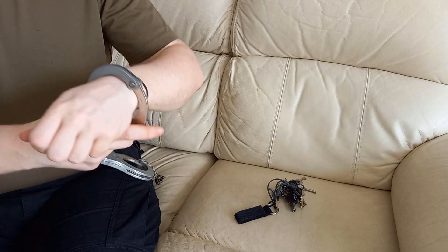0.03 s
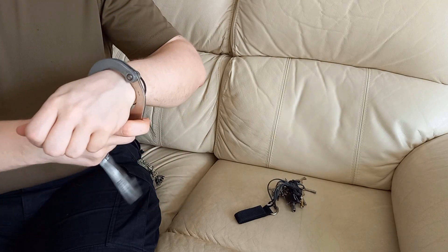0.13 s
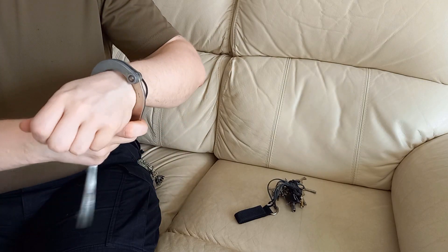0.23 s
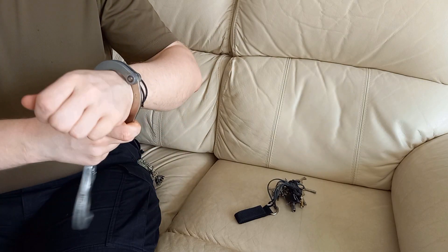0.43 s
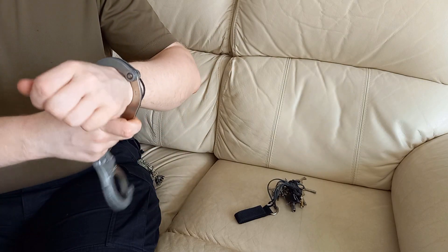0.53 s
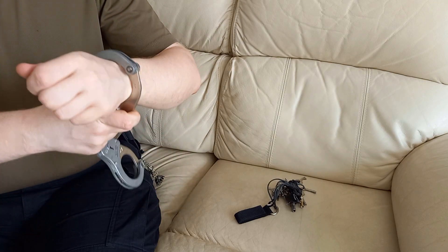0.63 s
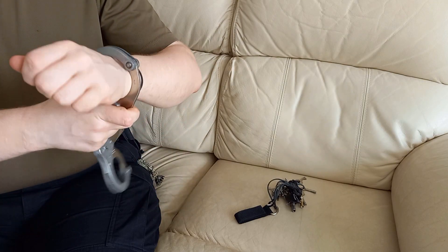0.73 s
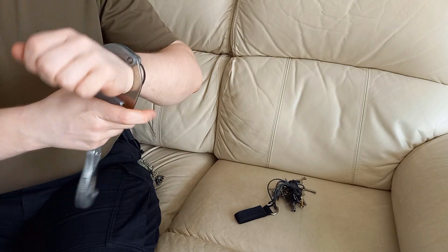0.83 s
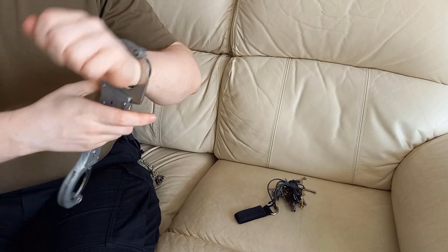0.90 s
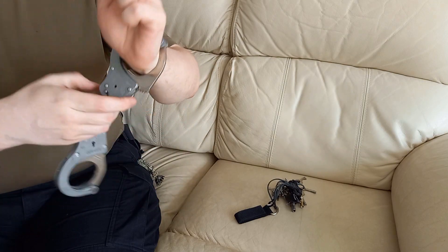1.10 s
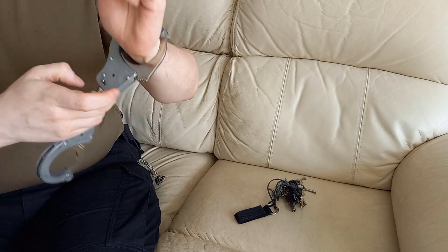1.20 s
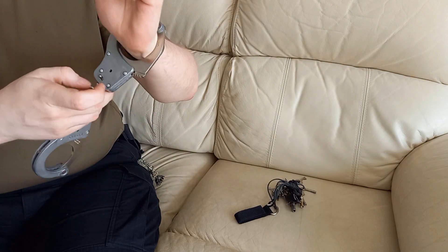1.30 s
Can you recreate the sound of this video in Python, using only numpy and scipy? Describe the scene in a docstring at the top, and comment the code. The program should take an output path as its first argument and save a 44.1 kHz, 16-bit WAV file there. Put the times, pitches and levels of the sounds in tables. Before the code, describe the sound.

Steel handcuff ratchet snaps rapidly five times, clicks once again, then its chain jingles softly

```python
"""Faint room tone with a dying clink tail and soft chain clinks; then steel handcuffs close on a wrist.
The pawl snaps over five ratchet teeth, then one more, and the chain and free cuff clink again.
A snap is chattering noise plus decaying steel modes, a dull knock and a low thump, mostly on the left.
Clinks are shorter, softer noise and modes; early reflections and a diffuse tail answer every click.
Room tone, the opening tail and a low rustle after the last snap are shaped noise."""
import sys
import numpy as np
from scipy import signal
from scipy.fft import rfft, irfft, next_fast_len
from scipy.io import wavfile
from scipy.ndimage import uniform_filter1d

SR = 44100
rng = np.random.default_rng(int(sys.argv[2]) if len(sys.argv) > 2 else 0)


def transcribe(signal):
    """Save signal, clipped to [-1, 1], as a 16-bit WAV file at the path in sys.argv[1]."""
    frames = np.atleast_2d(signal).T
    limited = np.clip(frames, -1, 1)
    pcm = np.round(limited * 32767).astype(np.int16)
    wavfile.write(sys.argv[1], SR, pcm)


N = 59535

# room tone spectrum: (frequency [Hz], relative density [dB per Hz])
FLOOR_SPECTRUM = [(20, -24), (45, -10), (70, 7), (130, 0), (250, -7), (600, -10.5), (1200, -19.5),
                  (3000, -22.5), (6000, -23), (12000, -27), (15000, -36), (16500, -25)]
# low rustling noise: a short dull swell just after the last snap, then cloth moving:
# (time [s], rms level [dB])
RUSTLE_LEVEL = [(.7, -101), (.78, -63), (.87, -91.5), (.95, -80), (1.05, -69), (1.13, -74), (1.22, -73.5),
                (1.35, -83.5)]
# rustle spectrum: (frequency [Hz], relative density [dB per Hz])
RUSTLE_SPECTRUM = [(25, -19), (70, 1), (200, -0.5), (600, -17), (1500, -13), (4000, -15.5), (10000, -28),
                   (16000, -44.5)]
# decay of the diffuse tail: (frequency [Hz], t60 [s])
ROOM_T60 = [(70, .6), (250, 0.53), (1000, 0.3), (2000, 0.27), (3000, 0.25), (4700, 0.27), (8000, 0.25),
            (12000, 0.22), (16000, 0.2)]
# colour of the diffuse tail: (frequency [Hz], relative gain [dB])
ROOM_GAIN = [(70, 0), (400, -2.5), (1000, -4.5), (2000, 4.5), (3000, 2.5), (4700, 1.5), (8000, -4),
             (11500, -3.5), (12800, -9.5), (14000, -1.5), (16000, -8.5)]
# chain clinks; room is before CHAIN_ROOM_DB:
# (time [s], tick [dB], link ring [dB], cuff ring [dB], swivel ring [dB], room [dB])
CLINKS = [(0.0171, -42, -60.5, -44, -59.5, 1), (.0418, -51.5, -60.5, -54.5, -70, -20.5),
          (0.1639, -65.5, -82, -71.5, -81.5, 2.5), (0.909, -44, -44.5, -61, -57, 1.5),
          (.992, -54.5, -81, -67, -77, 2.5), (1.027, -67, -91, -62.5, -91, 20.5),
          (1.0315, -52.5, -72, -74, -98, -9), (1.0577, -49.5, -39.5, -36, -48, -5.5),
          (1.122, -47.5, -39, -49.5, -44, -1.5), (1.1375, -55, -49.5, -58, -55.5, -20),
          (1.2022, -41.5, -39.5, -36, -36, -0.5), (1.224, -46.5, -39.5, -66, -51, -0.5),
          (1.2466, -44.5, -37.5, -47.5, -39, -2)]
# ratchet teeth: (time [s], crack [dB], chatter length [s], treble tilt [dB per octave, well above 1 kHz],
# pawl ring [dB], bow ring [dB], frame ring [dB], rack ring [dB], thump [dB], thump rise [s], room [dB])
TEETH = [(0.2008, -23, 0.0057, 0, -15, -16, -38, -37, -11, 0.0011, -1.5),
         (0.2324, -19.5, 0.0091, 2, -3, -12, -41.5, -25.5, -12.5, 0.00043, -1),
         (0.2767, -18.5, 0.0056, 1, -14, -4, -39, -22.5, -12.5, 0.0017, -3.5),
         (0.3323, -14.5, .003, 3.5, -17, -32, -46.5, -26.5, -21, 0.0014, -2),
         (0.4078, -16, 0.0025, 2, -14.5, -32.5, -49.5, -28.5, -27, 0.00093, -2),
         (0.7281, -26.5, 0.0069, 1, -26.5, -66, -52, -75, -21.5, 0.00044, 3)]
# modes of the chain link: (frequency [Hz], relative level [dB], t60 [s])
LINK_MODES = [(8980, -1, .016), (10550, 0, .016), (10720, -4, .014), (12300, -7, .012)]
# modes of the free cuff: (frequency [Hz], relative level [dB], t60 [s])
CUFF_MODES = [(4717, -8.5, 0.022), (6680, -17.5, .015), (11400, -13.5, .02)]
# modes of the swivel: (frequency [Hz], relative level [dB], t60 [s])
SWIVEL_MODES = [(8180, -0.5, 0.014), (12800, -5.5, .016), (13850, 3.5, 0.0083)]
# modes of the pawl: (frequency [Hz], relative level [dB], t60 [s])
PAWL_MODES = [(11470, -6, .028), (11650, -12, .02), (12130, -17, .02), (12830, 0, .024), (12990, -12, .015),
              (13800, -18, .02), (14300, -17, .02), (15550, -16, .02)]
# modes of the bow: (frequency [Hz], relative level [dB], t60 [s])
BOW_MODES = [(8500, -4, .018), (9040, 0, .016), (9280, -5, .016)]
# modes of the frame: (frequency [Hz], relative level [dB], t60 [s])
FRAME_MODES = [(1910, 0, .06), (2040, 0, .05), (2150, -4, .04), (2300, -8, .03)]
# modes of the toothed rack: (frequency [Hz], relative level [dB], t60 [s])
RACK_MODES = [(1420, -20, .04), (3350, -15, .015), (4420, -4, .025), (4570, -24, .3), (4650, -21, .3),
              (4690, -1, .03), (5020, -3, .02)]
# contact noise of a clink, also of the opening tail: (frequency [Hz], relative level [dB])
TICK_SPECTRUM = [(300, -10), (1500, -17.5), (2600, -5), (3700, 1.5), (4700, 1.5), (5500, 5.5), (7000, 5.5),
                 (10500, 7.5), (13000, -0.5), (15600, 4.5), (16600, -40.5)]
# contact noise of a tooth: (frequency [Hz], relative level [dB])
CRACK_SPECTRUM = [(200, -10.5), (700, -22), (1100, -22.5), (1600, -20), (2050, -7.5), (2550, -10.5),
                  (3200, -2), (3900, -3.5), (4700, 0), (6000, -2), (8300, 1), (10300, -1), (11500, 6.5),
                  (13500, 4), (15600, -2.5), (16600, -27.5)]
# the wrist's dull knock under each snap: (frequency [Hz], relative level [dB])
KNOCK_SPECTRUM = [(100, -5), (200, 1.5), (450, -1), (650, 1), (1000, -25.5), (2000, -34), (5000, -66.5)]

T = np.arange(int(.7 * SR)) / SR  # time axis of one click [s]
FLOOR_DB, OPENING_DB, OPENING_T60_S = -74.5, -59.5, .28
ATTACK_S, RELEASE_T60_S, TICK_S = 0.00076, 0.03, 0.0012
CHATTER_RMS_DB, CHATTER_SAG_DB_PER_S = 2.5, 452.5  # rms before clipping at two deviations
CRACK_CORRELATION = 0.25  # left to right
RING_RISE_SHARE, RING_DRIFT_RAD = 0.63, .75  # build-up per contact length; rms phase wander
RIGHT_LAG_S, RIGHT_DB = 0.0001581, -3.5
ROOM_DELAY_S, ROOM_BUILD_S, CHAIN_ROOM_DB = 0.0025, 0.011, -2.5
WALL_S, WALL_DB, WALL_T60_S = .0105, -19.5, 0.042  # reflections from nearby furniture
THUMP_RELEASE_S, THUMP_CUT_HZ, THUMP_RIGHT_DB = .013, 52, -38  # release is a time constant
BOOM_HZ, BOOM_T60_S, BOOM_DB = 66.5, 0.68, -40.5  # lowest room resonance, before the thump level
KNOCK_DB, KNOCK_S = -33, 0.0017  # level against the thump
TOP_HZ = 16350


def amp(db):
    """Amplitude ratio from dB."""
    return 10 ** (np.asarray(db) / 20)


def fade(t, t60_s):
    """Exponential decay, 60 dB in t60_s."""
    return np.exp(-np.log(1000) * t / t60_s)


def along(points, hz):
    """Interpolate (frequency, value) points on a log frequency axis."""
    point_hz, value = np.transpose(points)
    return np.interp(np.log(hz + 1), np.log(point_hz + 1), value)


def filtered(x, response):
    """Multiply the spectrum of x by a response of frequency."""
    n = x.shape[-1]
    size = next_fast_len(2 * n)
    hz = np.fft.rfftfreq(size, 1 / SR)
    return irfft(rfft(x, size) * response(hz), size)[..., :n]


def coloured(x, points, tilt_db=0, size=2048):
    """Minimum-phase filter of unit energy with the given spectrum and treble tilt."""
    hz = np.fft.rfftfreq(size, 1 / SR)
    level_db = along(points, hz) + tilt_db * np.log2(1 + hz / 1000)
    # folding the cepstrum makes the filter causal
    cepstrum = irfft(np.log(amp(level_db)))
    cepstrum[1:size // 2] *= 2
    cepstrum[size // 2 + 1:] = 0
    impulse = irfft(np.exp(rfft(cepstrum)))
    impulse = impulse / np.linalg.norm(impulse)
    return signal.fftconvolve(x, impulse[None], axes=1)[:, :x.shape[1]]


def add(out, time_s, sound):
    """Mix a stereo sound into out at time_s."""
    part = out[:, max(round(time_s * SR), 0):][:, :sound.shape[1]]
    part += sound[:, :part.shape[1]]


def hiss(spectrum):
    """Stereo shaped noise of rms 1."""
    noise = filtered(rng.standard_normal((2, N)), lambda hz: amp(along(spectrum, hz)))
    return noise / noise.std()


def background():
    """Faint room tone, the fading tail of an earlier clink, and a low rustle: a dull swell, then cloth."""
    t = np.arange(N) / SR
    room_tone = amp(FLOOR_DB) * hiss(FLOOR_SPECTRUM)
    opening = amp(OPENING_DB) * fade(t, OPENING_T60_S) * hiss(TICK_SPECTRUM)
    rustle = amp(np.interp(t, *np.transpose(RUSTLE_LEVEL))) * hiss(RUSTLE_SPECTRUM)
    return room_tone + opening + rustle


def in_room(click, room_db, size=512):
    """The click reaches the left microphone first; early reflections and a diffuse tail follow."""
    hz, t, bins = signal.stft(rng.standard_normal((2, len(T))), SR, nperseg=size)
    t60_s = along(ROOM_T60, hz)[:, None]
    # gain offsets the energy of each band's decay length
    gain = amp(along(ROOM_GAIN, hz))[:, None] * np.sqrt(2 * np.log(1000) / (t60_s * SR))
    tail = signal.istft(bins * gain * fade(t, t60_s), SR, nperseg=size)[1][:, :len(T)]
    tail = tail * np.clip((T - ROOM_DELAY_S) / ROOM_BUILD_S, 0, 1)
    early = rng.standard_normal((2, len(T))) * (T > WALL_S) * fade(T, WALL_T60_S)
    response = tail + amp(WALL_DB) * early / np.linalg.norm(early[0])

    def to_microphones(f):
        right = amp(RIGHT_DB) * np.exp(-2j * np.pi * f * RIGHT_LAG_S)
        return np.array([np.ones(len(f)), right])

    direct = filtered(click, to_microphones)
    return direct + amp(room_db) * signal.fftconvolve(click, response, axes=1)[:, :len(T)]


def contact(length_s, colour, tilt_db=0, size=18):
    """A brief contact chatters in uneven, weakening tiny impacts: level-modulated noise."""
    envelope = np.minimum(T / ATTACK_S, 1) * fade(np.maximum(T - length_s, 0), RELEASE_T60_S)
    left, other, chance = rng.standard_normal((3, len(T)))
    chatter = np.clip(uniform_filter1d(chance, size) * np.sqrt(size), -2, 2)
    envelope = envelope * amp(CHATTER_RMS_DB * chatter - CHATTER_SAG_DB_PER_S * T)
    right = CRACK_CORRELATION * left + np.sqrt(1 - CRACK_CORRELATION ** 2) * other
    return coloured(envelope * np.array([left, right]), colour, tilt_db)


def ring(modes, length_s, size=90):
    """A part's modes build up at a rate set by the contact and die quickly, damped by the hand."""
    hz, db, t60_s = np.transpose(modes)[:, :, None]
    noise = rng.standard_normal((len(modes), len(T)))
    wander = uniform_filter1d(noise, size, axis=1) * np.sqrt(size)
    phase = 2 * np.pi * (hz * T + rng.random(hz.shape)) + RING_DRIFT_RAD * wander
    modes_sum = (amp(db) * fade(T, t60_s) * np.sin(phase)).sum(0)
    return modes_sum * 2 * (1 - np.exp(-T / (RING_RISE_SHARE * length_s)))


def chain():
    """Links, swivel and the free cuff knock lightly together."""
    out = np.zeros((2, N))
    for time_s, tick_db, link_db, cuff_db, swivel_db, room_db in CLINKS:
        parts = [(LINK_MODES, link_db), (CUFF_MODES, cuff_db), (SWIVEL_MODES, swivel_db)]
        rings = sum(amp(db) * ring(modes, TICK_S) for modes, db in parts)
        tick = amp(tick_db) * contact(TICK_S, TICK_SPECTRUM)
        add(out, time_s, in_room(tick + rings, room_db + CHAIN_ROOM_DB))
    return out


def thump(rise_s, order=6):
    """One low push swings out through the microphone's bass cut, with a faint room boom."""
    push = -(1 - np.exp(-T / rise_s)) * np.exp(-T / THUMP_RELEASE_S)
    bass_cut = signal.butter(order, THUMP_CUT_HZ, 'high', fs=SR, output='sos')
    swing = signal.sosfilt(bass_cut, push)
    boom = amp(BOOM_DB) * np.sin(2 * np.pi * BOOM_HZ * T) * fade(T, BOOM_T60_S)
    return np.array([[1], [amp(THUMP_RIGHT_DB)]]) * (swing + boom)


def ratchet():
    """The pawl drops off each tooth and rings itself, the bow, the frame and the toothed rack."""
    out = np.zeros((2, N))
    for (time_s, crack_db, length_s, tilt_db, pawl_db, bow_db, frame_db, rack_db,
         thump_db, rise_s, room_db) in TEETH:
        parts = [(PAWL_MODES, pawl_db), (BOW_MODES, bow_db),
                 (FRAME_MODES, frame_db), (RACK_MODES, rack_db)]
        rings = sum(amp(db) * ring(modes, length_s) for modes, db in parts)
        crack = amp(crack_db) * contact(length_s, CRACK_SPECTRUM, tilt_db)
        knock = amp(thump_db + KNOCK_DB) * contact(KNOCK_S, KNOCK_SPECTRUM)
        snap = in_room(crack + rings + knock, room_db)
        add(out, time_s, snap + amp(thump_db) * thump(rise_s))
    return out


def scene():
    """Sum of background, chain and ratchet."""
    return background() + chain() + ratchet()


def record(dry):
    """The recorder keeps nothing above its band limit."""
    return filtered(dry, lambda hz: hz < TOP_HZ)


dry = scene()
out = record(dry)
transcribe(out)
```